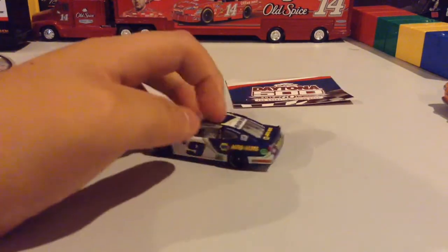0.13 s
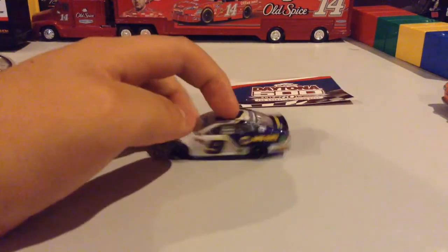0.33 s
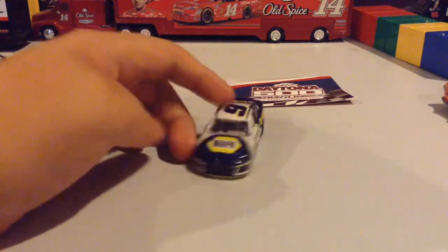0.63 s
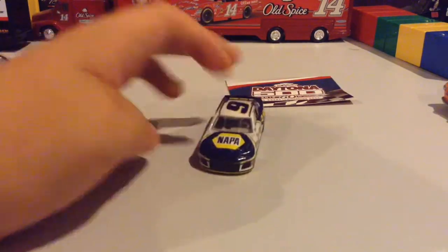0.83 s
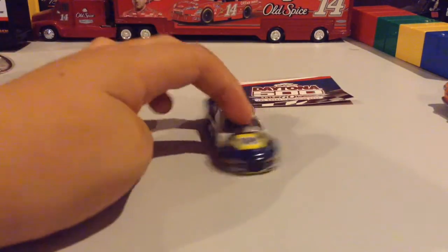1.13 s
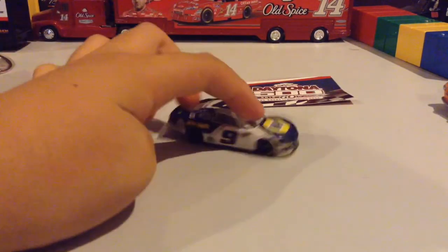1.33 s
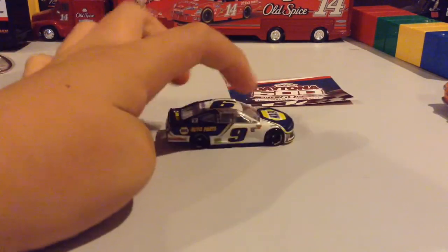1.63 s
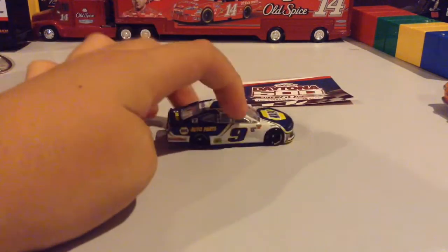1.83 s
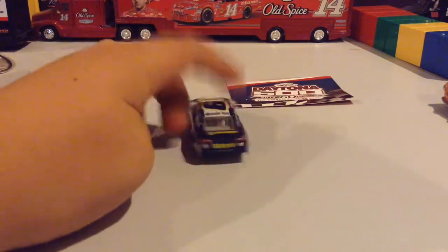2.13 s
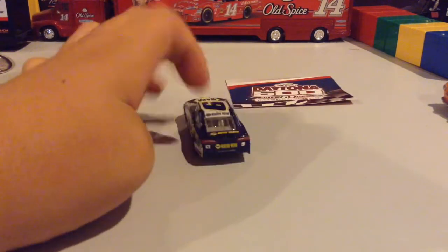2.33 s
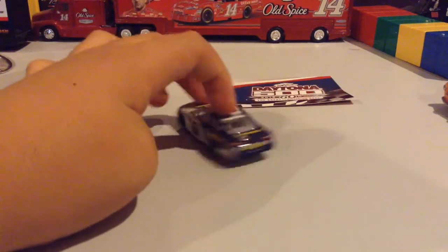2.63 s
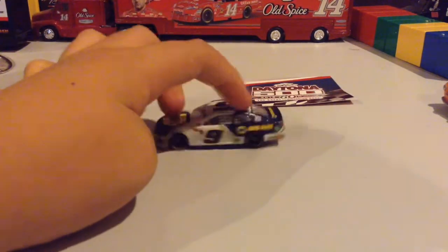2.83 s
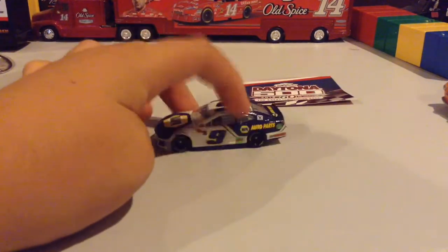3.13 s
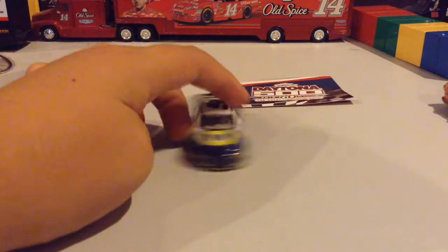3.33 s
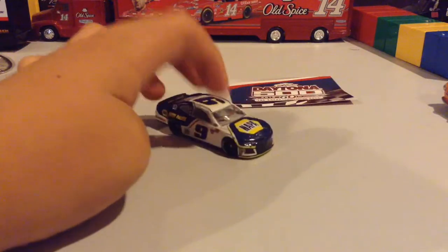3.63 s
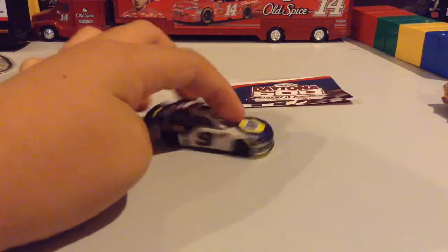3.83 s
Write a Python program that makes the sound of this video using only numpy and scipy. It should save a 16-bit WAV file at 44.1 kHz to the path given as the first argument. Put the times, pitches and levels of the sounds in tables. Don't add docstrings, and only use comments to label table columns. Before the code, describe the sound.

A toy car's hard wheels skid on a hollow tabletop in six bursts, roughly 0.2-0.7, 1.05-1.55, 1.9-2.35, 2.5-2.95, 3.15-3.6 and 3.7-4.0 seconds. Each is a grainy, metallic scrape with loose axle rattles, dull table knocks, faint squeaky wheel tones and gritty ticks. The last is loudest, clattering sharply near 3.9. Short gaps hold faint hush; close microphone, small room with short echo.

```python
import sys
import numpy as np
from scipy import signal
from scipy.fft import rfft, irfft
from scipy.io import wavfile

SR = 44100
rng = np.random.default_rng(int(sys.argv[2]) if len(sys.argv) > 2 else 0)


def to_linear_factor(level_db):
    exponent = np.asarray(level_db, float) / 20
    return 10 ** exponent


def unload_audio(sound):
    columns = np.transpose(np.atleast_2d(sound))
    steps = np.round(np.clip(columns, -1, 1) * 32767)
    wavfile.write(sys.argv[1], SR, steps.astype(np.int16))


N = 176400


def rms_one(x):
    return x / np.sqrt(np.mean(x ** 2) + 1e-20)


def drift(rate_hz):
    r = np.exp(-16 * np.pi * rate_hz / SR)
    noise = rng.standard_normal(N // 8 + 4002)
    slow = signal.lfilter([1], [1, -2 * r, r * r], noise)[4000:]
    return np.interp(np.arange(N) / 8, np.arange(len(slow)), rms_one(slow))


def resonate(x, hz, width):
    r = np.exp(-np.pi * width / SR)
    top = (1 - r * r) / 2 * np.array([1, 0, -1])
    return signal.lfilter(top, [1, -2 * r * np.cos(2 * np.pi * hz / SR), r * r], x + 1e-18)


def grains(per_s, spread_db):
    size = to_linear_factor(spread_db * np.minimum(rng.exponential(1, N), 5)) * rng.choice([-1, 1], N)
    return rms_one(size * (rng.random(N) < per_s / SR))


def clicks(times, db):
    out = np.zeros(N)
    out[(np.asarray(times) * SR).astype(int)] = to_linear_factor(np.asarray(db))
    return out


def body(x, modes, gains_db, flip=-1):
    out = 0
    for k, (hz, width, db) in enumerate(modes):
        ring = resonate(x[k % len(x)], hz, width)
        out = out + flip ** k * to_linear_factor(db + gains_db[k]) * ring
    return out


# (time [s], skid level [dB], table drumming relative to the skid [dB])
FIRST_PUSHES = [
    [(0.17, -85, 41), (0.214, -42, 5), (0.316, -52.5, 16), (0.334, -54, -7), (0.342, -62, 28),
     (0.358, -37, 3.5), (0.546, -43, 7), (0.608, -36.5, 3.5), (0.71, -54, 7)],
    [(1.05, -58, 2), (1.096, -60, 10), (1.102, -46, 9.5), (1.256, -41, 4.5), (1.35, -50, 11.5),
     (1.358, -38, 1), (1.454, -46, 7.5), (1.514, -46.5, 7), (1.56, -96, 44)],
    [(1.87, -58, -5), (1.896, -67, 5), (1.902, -52.5, 7), (1.942, -37.5, 3.5), (2.09, -39.5, 2),
     (2.102, -38, 5), (2.11, -43, -9), (2.13, -43, 5.5), (2.36, -69.5, 5.5)],
]
LAST_PUSHES = [
    [(2.5, -96, 38), (2.544, -55, 5.3), (2.616, -58, 13.3), (2.632, -43.5, 3.8), (2.802, -37, 1.6),
     (2.82, -43.5, 14), (2.84, -38.5, 4.3), (2.924, -54.5, 13), (2.98, -102, 8.1)],
    [(3.15, -85, -2), (3.166, -65, 12), (3.22, -48, 9), (3.292, -36, 4), (3.314, -40, 1), (3.324, -36, 3),
     (3.426, -37, -1), (3.454, -39, 3.5), (3.6, -75, 16.5)],
    [(3.7, -87, 3), (3.73, -63, 7), (3.742, -49, 5), (3.774, -42.5, 4), (3.814, -58.5, 15),
     (3.886, -31.5, 8), (3.964, -32.5, 9.5), (3.972, -31.5, 7.5), (4.0, -36.5, -9)],
]


def push_gains():
    t, skid_gain, drum_gain = np.arange(N) / SR, np.zeros(N), np.zeros(N)
    for push in list(FIRST_PUSHES) + list(LAST_PUSHES):
        s, db, drum_db = np.transpose(push)
        skid_gain += to_linear_factor(np.interp(t, s, db, left=-150, right=-150))
        drum_gain += to_linear_factor(np.interp(t, s, db + drum_db, left=-150, right=-150))
    return skid_gain, drum_gain


# (frequency [Hz], width [Hz], level [dB])
SHELL_MODES = [(1148, 166, -2), (1470, 187, 0.5), (2000, 420, 1), (2380, 860, -1), (2710, 210, -3),
               (2924, 350, -0.5), (3685, 310, 1), (4210, 170, -1), (4756, 160, -0.5), (5180, 130, -1),
               (6060, 270, -7.5), (7180, 270, -10.5), (9500, 630, -18), (13400, 3900, -28)]
GRAINS_PER_S, GRAIN_SPREAD_DB = 3200, 3.5
CLUMP_HZ, CLUMP_DB, SHARED_CLUMP_DB = 56, 2, 1.05
WANDER_HZ, WANDER_DB = 20, -2.5
BRIGHTER_DB_PER_OCTAVE, BRIGHT_AT_DB = 0.1433, -56
TREBLE_PATCH_HZ, TREBLE_PATCH_DB = 60, 4.5
SKID_DB = -6.5


def skid(gain):
    shared = to_linear_factor(SHARED_CLUMP_DB * drift(CLUMP_HZ))
    rub = []
    for _ in range(4):
        clump = shared * to_linear_factor(CLUMP_DB * drift(CLUMP_HZ))
        rub.append(clump * grains(GRAINS_PER_S, GRAIN_SPREAD_DB))
    tilt = BRIGHTER_DB_PER_OCTAVE * np.maximum(20 * np.log10(gain) - BRIGHT_AT_DB, -30)
    mode_gains = []
    for hz, _, _ in SHELL_MODES:
        mode_db = WANDER_DB * drift(WANDER_HZ) + tilt * np.log2(hz / 3000)
        if hz > 8000:
            mode_db = mode_db + TREBLE_PATCH_DB * drift(TREBLE_PATCH_HZ)
        mode_gains.append(mode_db)
    return to_linear_factor(SKID_DB + 8.5) * gain * body(rub, SHELL_MODES, mode_gains)


# (frequency [Hz], width [Hz], level [dB])
TABLE_MODES = [(187, 32.4, -6), (232, 32, -2), (264.8, 28.8, 1), (309, 26.7, -0.5), (340.8, 23.6, -5),
               (441, 42, -18), (517.6, 35, -19), (790, 225, -24)]
# (time [s], peak level [dB])
TABLE_KNOCKS = [(0.157, -26.5), (0.333, -19), (0.393, -18), (0.403, -15), (0.455, -34), (0.513, -23),
                (0.563, -50), (0.608, -22.5), (0.672, -25.5), (0.954, -35), (1.104, -22), (1.122, -38),
                (1.169, -21), (1.407, -19.5), (1.452, -28), (1.499, -30), (1.947, -22.5), (2.024, -39),
                (2.053, -24), (2.101, -21), (2.195, -26.5), (2.275, -33), (2.537, -33), (2.582, -33),
                (2.794, -22.5), (3.311, -23), (3.883, -44), (3.9, -20.5), (3.938, -19), (3.956, -17)]
# (time [s], peak level [dB])
LATE_KNOCKS = [(2.691, -37), (2.83, -37), (3.228, -34), (3.247, -28.5), (3.281, -24.5), (3.344, -28),
               (3.36, -20.5), (3.401, -29), (3.439, -27), (3.852, -35), (3.915, -20), (3.973, -12.5),
               (3.988, -18.5)]
BUMPS_PER_S, BUMP_SPREAD_DB, DRUM_DB = 420, 1.5, -5
KNOCK_S, KNOCK_DB, KNOCK_HZ = 0.001, -6.5, 266.4
KNOCK_FOCUS_DB = 60


def table(gain):
    bumps = [grains(BUMPS_PER_S, BUMP_SPREAD_DB)]
    rolling = to_linear_factor(DRUM_DB) * gain * rms_one(body(bumps, TABLE_MODES, np.zeros(len(TABLE_MODES))))
    soft = np.exp(-1 / (KNOCK_S * SR))
    blow = signal.lfilter([1], [1, -soft], clicks([0], [0]))
    focus = [-min(KNOCK_FOCUS_DB * abs(np.log2(hz / KNOCK_HZ)), 10) for hz, _, _ in TABLE_MODES]
    boom = body([blow], TABLE_MODES, focus, flip=0.55)[:SR // 8]
    hits = clicks(*np.transpose(list(TABLE_KNOCKS) + list(LATE_KNOCKS)))
    knocks = np.convolve(hits, boom / np.abs(boom).max())[:N]
    return rolling + to_linear_factor(KNOCK_DB) * knocks


# (time [s], peak level [dB], brightness tilt [dB/octave])
FIRST_RATTLES = [(0.1555, -37.5, 4), (0.2084, -22.5, -0.5), (0.3318, -21.5, -3.5), (0.3606, -27, 8),
                 (0.3614, -31, -5), (0.3766, -33, -8), (0.3887, -23.5, -6), (0.403, -17.5, -3),
                 (0.5636, -39, -5), (1.0009, -34.5, 10), (1.0243, -35, -2.5), (1.0476, -37.5, 7),
                 (1.1037, -21.5, 2), (1.1695, -25, 8.5), (1.2605, -29.5, 3), (1.356, -22, 2),
                 (1.3874, -31, 11.5), (1.4183, -24.5, 9.5), (1.4583, -26, 7.5), (1.504, -26, 4.5),
                 (1.9061, -29.5, -1), (1.9455, -19, 12), (1.9862, -25, 11.5), (2.099, -17.5, 6.5),
                 (2.2752, -42.5, -10.5)]
LAST_RATTLES = [(2.538, -42, -3), (2.5541, -53, 2.2), (2.6334, -21, 2.5), (2.6624, -26, -4),
                (2.685, -20, -1.5), (2.7116, -22, 2.5), (2.7531, -24, 0), (2.7701, -21.5, 0),
                (2.7935, -27, 1), (2.9064, -32.5, -1), (3.214, -29.5, 2), (3.229, -26.5, 1.5),
                (3.275, -39, -1), (3.7423, -29, 3), (3.7658, -36, -1), (3.8895, -14, 3),
                (3.9022, -16.5, 6.6), (3.912, -18, 7), (3.9205, -23, 5), (3.9385, -25, 8), (3.944, -15, 7),
                (3.9566, -17.5, 3), (3.962, -18, 7)]
RATTLE_S, RATTLE_DB, RATTLE_SPREAD_DB, TILT_PIVOT_HZ = 0.002, -26.5, 1.5, 3900


def rattles():
    s, db, tilt = np.transpose(list(FIRST_RATTLES) + list(LAST_RATTLES))
    decay, chatter, out = np.exp(-1 / (RATTLE_S * SR)), rng.choice([-1, 1], N), 0
    swell_and_die = np.convolve([1, -decay], [1, -decay ** 4])
    spread = rng.normal(0, RATTLE_SPREAD_DB, (len(s), len(SHELL_MODES)))
    for k, (hz, width, level_db) in enumerate(SHELL_MODES):
        tilt_db = np.clip(tilt, -14, 6) * np.log2(hz / TILT_PIVOT_HZ)
        hits = clicks(s, db + tilt_db + spread[:, k])
        burst = signal.lfilter([1], swell_and_die, hits + 1e-18)
        out = out + (-1) ** k * to_linear_factor(level_db) * resonate(chatter * burst, hz, 2 * width)
    return to_linear_factor(RATTLE_DB) * out


# (start time [s], length [s], frequency [Hz], level [dB])
WHEEL_SINGS = [(1.064, 0.2, 1380, -53.5), (1.2, 0.237, 1480, -50.5), (1.114, 0.25, 1130, -54.5),
               (1.135, 0.18, 3670, -50), (1.352, 0.078, 5300, -48), (1.94, 0.27, 4610, -47),
               (2.22, 0.14, 4500, -71), (1.93, 0.22, 2980, -48.5), (2.194, 0.19, 780, -60),
               (2.198, 0.13, 1720, -62), (3.732, 0.052, 1540, -51), (3.811, 0.16, 1500, -50),
               (3.851, 0.19, 2850, -41), (3.253, 0.298, 2700, -50), (1.087, 0.13, 7040, -54),
               (0.187, 0.13, 1120, -55)]
SING_GRAINS_PER_S, SING_FLUTTER_DB = 1500, 4
SING_RISE_SHARE, SING_WIDTH_HZ = 0.18, 250


def sings():
    t, out = np.arange(N) / SR, 0
    rub = to_linear_factor(SING_FLUTTER_DB * drift(120)) * grains(SING_GRAINS_PER_S, 2.5)
    for k, (start, length, hz, db) in enumerate(WHEEL_SINGS):
        part = np.clip((t - start) / length, 0, 1)
        fade = np.minimum(part / SING_RISE_SHARE, 1) * np.sqrt(1 - part ** 2)
        own_rub = np.roll(rub, 997 * k)
        tone = resonate(resonate(own_rub, hz, SING_WIDTH_HZ), hz, 2 * SING_WIDTH_HZ)
        out = out + to_linear_factor(db) * fade * rms_one(tone)
    return out


# (time [s], peak level [dB], ringing pitch [Hz])
GRIT_TICKS = [(0.208, -47, 7530), (0.33, -35, 7570), (0.3555, -36.5, 7240), (0.3615, -42, 7560),
              (0.3879, -36, 7210), (0.403, -33.5, 8410), (0.615, -37, 6140), (0.6373, -39, 6220),
              (0.999, -48, 7280), (1.0264, -42, 7130), (1.0484, -48, 7050), (1.1033, -39, 7210),
              (1.1531, -50, 6980), (1.1701, -38, 6750), (1.2629, -42.5, 9400), (1.3565, -38, 6220),
              (1.3876, -33, 7700), (1.4071, -37, 6260), (1.457, -43, 6160), (1.9047, -47, 6150),
              (1.9496, -35, 12200), (1.9862, -36, 6450), (1.9862, -33, 6890), (2.0222, -43, 6890),
              (2.085, -40, 6350), (2.1, -36.5, 6470), (2.6338, -53, 6510), (2.6548, -56, 6440),
              (2.6857, -35.5, 9200), (2.7525, -51, 6970), (2.768, -41, 7200), (2.7919, -46, 7260),
              (3.2135, -51, 7400), (3.2294, -47, 6140), (3.2648, -56, 9110), (3.2823, -46, 9180),
              (3.2823, -44, 9220), (3.3247, -48, 6030), (3.3372, -53, 6220), (3.399, -48, 8680),
              (3.4, -41, 9690), (3.415, -46, 9570), (3.86, -46, 6110), (3.869, -36, 6090),
              (3.889, -33, 6000), (3.8884, -37, 6110), (3.9024, -29, 6540), (3.9202, -22.5, 7360),
              (3.9383, -25.5, 6500), (3.9568, -22, 6500)]
TICK_S, TICK_DB, TICK_WIDTH_HZ, TICK_BROAD_DB = 0.0021, 3, 1700, 0


def ticks():
    out, t = np.zeros(N + 400), np.arange(400) / SR
    high = signal.butter(2, 4000, "high", fs=SR, output="sos")
    shape = np.exp(-t / TICK_S) * (1 - np.exp(-4 * t / TICK_S))
    for s, db, hz in GRIT_TICKS:
        burst = rng.standard_normal(len(t)) * shape
        ring = 3 * resonate(burst, hz, TICK_WIDTH_HZ)
        snap = ring + to_linear_factor(TICK_BROAD_DB) * signal.sosfilt(high, burst)
        first = int(s * SR)
        out[first:first + len(t)] += to_linear_factor(db + TICK_DB) * snap / np.abs(snap).max()
    return out[:N]


# (time [s], peak level [dB])
HAND_JOLTS = [
    (0.086, -62),
    (0.334, -65),
    (0.404, -62),
    (0.959, -80),
    (1.169, -63),
    (1.959, -73),
    (2.098, -67),
    (2.638, -74),
    (3.239, -69),
]
JOLT_S, JOLT_DB = 0.0037, 3


def jolts():
    t = np.arange(-1500, 1500) / SR / JOLT_S
    swing = -2 * t * np.exp(-t * t)
    return to_linear_factor(JOLT_DB) * np.convolve(clicks(*np.transpose(HAND_JOLTS)), swing, "same")


ROOM_T60_S, ROOM_DB, WALL_CUT_HZ = 0.19, -14, 4500


def room(x):
    out, dull = np.zeros(N), np.exp(-2 * np.pi * WALL_CUT_HZ / SR)
    lags = (rng.uniform(.012, .035, size=8) * SR).astype(int)
    for k, lag in enumerate(lags):
        loop, gain, state = x.copy(), to_linear_factor(-60 * lag / SR / ROOM_T60_S), [0.]
        for i in range(lag, N, lag):
            back, state = signal.lfilter([gain * (1 - dull)], [1, -dull], loop[i - lag:i], zi=state)
            loop[i:i + lag] += back[:N - i]
        out += (loop - x) * (-1) ** k
    return out


# (frequency [Hz], level [dB per Hz])
HUSH_SPECTRUM = [(15, -62), (25, -50.5), (233, 2.5), (267, -6), (297, 0.5), (703, -13), (848, -19.5),
                 (12200, -26.5), (15500, -28)]
HUSH_DB = -56.5


def hush():
    hz, db = np.transpose(HUSH_SPECTRUM)
    f = np.maximum(np.arange(N // 2 + 1) * SR / N, 1)
    shape = to_linear_factor(np.interp(np.log(f), np.log(hz), db))
    return to_linear_factor(HUSH_DB) * rms_one(irfft(rfft(rng.standard_normal(N)) * shape, N))


def scene():
    skid_gain, drum_gain = push_gains()
    near = skid(skid_gain) + table(drum_gain) + rattles() + sings() + ticks()
    air = near + to_linear_factor(ROOM_DB) * room(near)
    bass_cut = signal.butter(6, 140, "high", fs=SR, output="sos")
    return (signal.sosfilt(bass_cut, air) + jolts() + hush())[None]


def band_limit(x):
    return signal.sosfilt(signal.butter(12, 15700, fs=SR, output="sos"), x)


def record(dry):
    top_cut = signal.ellip(12, .5, 70, 15250, fs=SR, output="sos")
    mix = signal.sosfilt(top_cut, dry)
    return band_limit(mix)


dry = scene()
out = record(dry)
unload_audio(out)
```